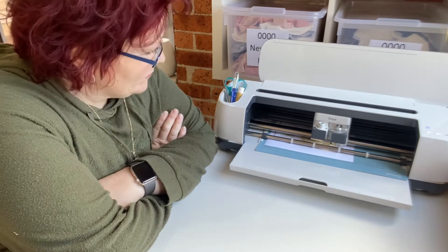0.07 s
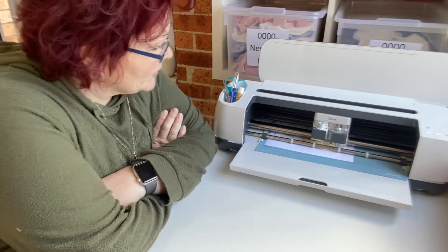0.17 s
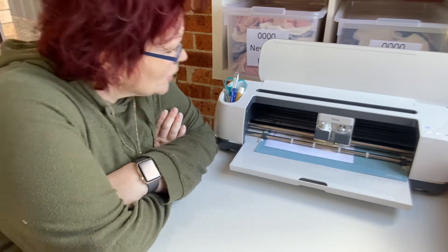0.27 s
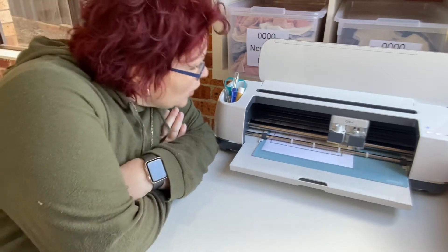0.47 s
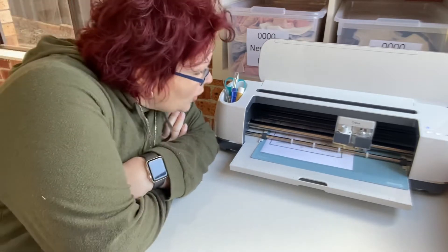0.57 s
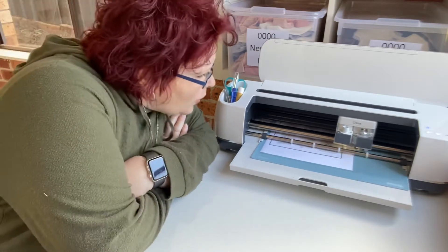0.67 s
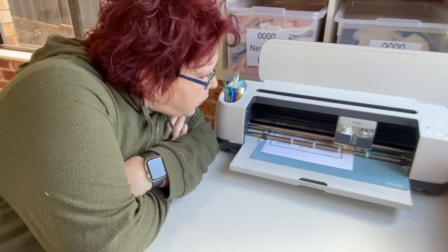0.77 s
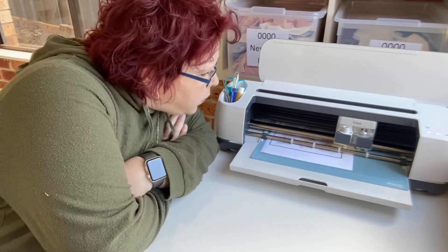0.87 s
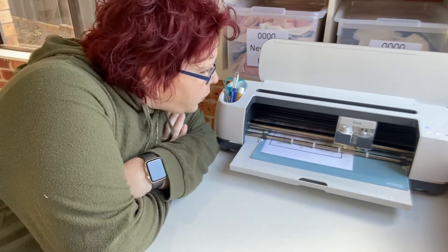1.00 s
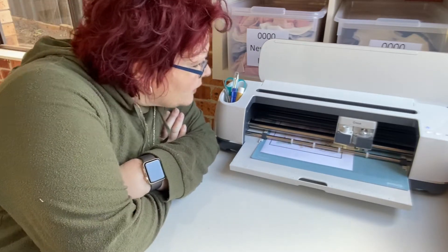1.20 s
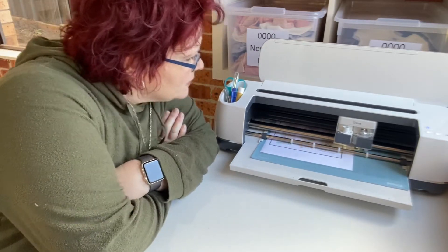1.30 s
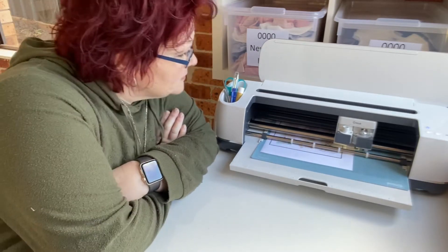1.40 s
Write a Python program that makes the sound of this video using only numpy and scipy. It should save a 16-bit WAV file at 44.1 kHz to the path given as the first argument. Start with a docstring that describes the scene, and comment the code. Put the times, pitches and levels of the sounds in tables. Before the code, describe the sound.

In a small quiet room, a cutting machine a little right of the microphone whirs up and brakes. A soft hissing glide follows, ending in a thump and a few plastic clacks over a low table shudder.

```python
"""A desktop cutting machine on a table, a little to the right, in a small quiet room.
With a thin snap a geared motor spins up, whines and rattles as it feeds the sheet through the rollers,
and brakes. The carriage then glides along its rail with a fading hiss. Last, the tool holder sets down
with a thump and a few plastic clacks. Case and table shudder underneath while anything moves."""
import sys
import numpy as np
from scipy import signal
from scipy.fft import rfft, irfft
from scipy.io import wavfile

SR = 44100
rng = np.random.default_rng(int(sys.argv[2]) if len(sys.argv) > 2 else 0)


def bounce(signal):
    """Save signal as a 16-bit WAV file at the path given by the first command-line argument."""
    frames = np.transpose(np.atleast_2d(signal))
    limited = np.clip(frames, -1, 1)
    pcm = np.round(limited * 32767).astype(np.int16)
    wavfile.write(sys.argv[1], SR, pcm)


N = 63945
T = np.arange(N) / SR
FEED_LEAD_MS, CARRIAGE_LEAD_MS = 0.17, 0.094  # how much sooner the right ear hears them


# feed motor's run: (time [s], speed [share of full])
MOTOR_SPEED = [(.195, .05), (.24, .58), (.265, .77), (.284, 1.0), (.53, 1.0), (.565, .76), (.595, .5),
               (.635, .05)]
def feed_motor(mesh_hz=685.6, wobble=0.0007, jitter_rad=0.13, grain=0.28):
    """One motor drives gears, shafts and rollers; returns its tones and its tooth-pulsed noise."""
    speed = in_time(MOTOR_SPEED)
    travel = np.cumsum(speed * (1 + wobble * drift(11))) / SR
    teeth = mesh_hz * travel + jitter_rad * drift(110) / (2 * np.pi)
    tones = gear_whine(speed, teeth) + shaft_hum(speed, travel)
    contacts = rms_one(np.exp(grain * (np.cos(2 * np.pi * teeth) + .5 * drift(53))))
    return tones, contacts * (gear_rattle() + sheet_rub())


# whine envelope: (time [s], level [dB])
WHINE_ENVELOPE = [(.19, -55), (.24, -9), (.272, -5.5), (.293, 1.5), (.335, -1), (.362, -5.5), (.39, -1),
                  (.44, -0.5), (.49, -5), (.53, -7), (.56, -6.5), (.63, -29)]
# whine partials: (multiple of the tooth rate, level [dB], left over right [dB], right ear's lead [rad])
WHINE_PARTIALS = [(1, -30, 1.5, 0.41), (2, -23, -4, 1.23), (3, -36.5, 2, 0.16), (4, -45, -9.5, 2.1),
                  (6, -54, -9, 2.2)]
# housing resonances: (pitch [Hz], t60 [s], gain on the whine, level when shaken [dB])
HOUSING_MODES = [(1030, .12, 1.3, -41), (1205, .12, .25, -35), (1310, .12, .03, -38), (1420, .1, .03, -36),
                 (2075, .14, .4, -44)]
def gear_whine(speed, teeth, flutter_db=2):
    """Meshing teeth sing, directly and through the housing resonances that their pitch sweeps."""
    partials = sum(from_db(db) * tone(multiple * teeth, pan_db, lead, flutter_db)
                   for multiple, db, pan_db, lead in WHINE_PARTIALS)
    whine = level(WHINE_ENVELOPE) * partials
    direct = whine * speed ** 3.5
    return direct + sum(gain * resonance(whine, hz, t60) for hz, t60, gain, _ in HOUSING_MODES)


# shaft tones: (pitch at full speed [Hz], level [dB], left over right [dB], right ear's lead [rad])
SHAFT_TONES = [(76.3, -40, -2, .1), (296, -45, -3, .1), (312, -42, -4, .1), (423.6, -42, 3, .6),
               (510, -50, 0, .4), (811, -49, 1, .5), (1183.5, -48, -3, .8), (1268.6, -43, -4, .9),
               (1292.5, -43, -4, .9), (1309, -43, -4, .9), (1432.5, -46, -3, .9), (1728, -51, 3, 1.2),
               (2137, -52, 0, .5), (2196, -52, 0, .5)]
def shaft_hum(speed, travel, boost_db=2, flutter_db=2.5):
    """Shafts and slower gears hum, swelling steeply with speed."""
    running = np.clip(speed - MOTOR_SPEED[0][1], 0, 1) ** 5 * (T < MOTOR_SPEED[-1][0])
    return running * sum(from_db(boost_db + db) * tone(hz * travel, pan_db, lead, flutter_db)
                         for hz, db, pan_db, lead in SHAFT_TONES)


# rattle envelope: (time [s], level [dB])
RATTLE_ENVELOPE = [(.18, -57.5), (.215, -45), (.25, -28.5), (.3, -34.5), (.36, -33.5), (.43, -33),
                   (.52, -34.5), (.58, -33), (.625, -52), (.69, -48.5)]
# its midrange colour: (frequency [Hz], level [dB])
RATTLE_COLOUR = [(150, -27), (300, 0), (600, -7), (900, -0.5), (1110, -13), (1330, 1), (1530, -10),
                 (1730, 0), (1920, -23), (2200, -4.5), (2500, -16.5), (3400, -17), (3800, -23.5),
                 (6000, -34.5)]
def gear_rattle():
    """The gear teeth rattle, hardest during spin-up."""
    return level(RATTLE_ENVELOPE) * noise(RATTLE_COLOUR, lead_ms=0.16) * pan(-1)


# rub envelope: (time [s], level [dB])
SHEET_ENVELOPE = [(.2, -62.5), (.225, -56.5), (.25, -45), (.295, -39.5), (.36, -43.5), (.43, -38.5),
                  (.52, -44), (.56, -48.5), (.61, -57.5), (.68, -64)]
# its bright colour: (frequency [Hz], level [dB])
SHEET_COLOUR = [(1500, 9), (3200, 11), (4200, 6), (5400, 2), (6500, -1.5), (7700, 0), (8900, 7.5),
                (10000, 1), (12500, -3.5), (15000, -1), (16000, -22)]
def sheet_rub():
    """The sheet hisses as it rubs under the rollers."""
    return level(SHEET_ENVELOPE) * noise(SHEET_COLOUR, FEED_LEAD_MS)


# swells of motor strain: (time [s], half length [s], level [dB])
STRAIN_SWELLS = [(0.261, 0.029, 2), (0.568, .032, -3.5)]
def strained_housing():
    """The housing rings roughly while the motor speeds up and brakes."""
    shaken = sum(from_db(db) * rubbed_ring(hz, 2 / t60) for hz, t60, _, db in HOUSING_MODES)
    return swells(STRAIN_SWELLS) * pan(-3) * shaken


# envelopes of the glide's body and its hiss: (time [s], level [dB])
GLIDE_ENVELOPE = [(.62, -83), (.69, -49), (.73, -41.5), (.77, -40), (.85, -43.5), (.93, -49), (1.02, -56),
                  (1.1, -63.5), (1.2, -81)]
HISS_ENVELOPE = [(.68, -71), (.73, -51), (.8, -47), (.88, -51.5), (1.0, -56), (1.08, -66.5), (1.19, -79)]
# their colours: (frequency [Hz], level [dB])
GLIDE_COLOUR = [(200, -13), (550, 6), (950, -4.5), (1400, 4), (1900, 2), (2500, -6.5), (3200, -11),
                (4200, -22), (6000, -34)]
HISS_COLOUR = [(2000, 6.5), (4000, 1.5), (5500, 1.5), (7800, 2), (9500, -19.5), (12000, 0.5), (15000, -14),
               (16000, -10)]
# resonances rubbed by the carriage: (pitch [Hz], width [Hz], level [dB])
GLIDE_MODES = [(1718, 41, -14), (1930, 16, -13), (1886, 18, -14), (2304, 30, -19)]
# soft whirrs as it sets off and settles: (time [s], half length [s], level [dB])
WHIRR_SWELLS = [(.715, 0.025, -43.5), (1.11, 0.04, -53)]
def carriage(rail_hz=3498, sag_hz_per_s=330, grain_db=0.5):
    """Grainy sliding friction, a thin ring of the rail that sags in pitch, and a whirr at each end."""
    rail_pitch = rail_hz - sag_hz_per_s * (T - HISS_ENVELOPE[1][0])
    rail = from_db(-4.5) * rubbed_ring(rail_pitch, width_hz=43)
    body = noise(GLIDE_COLOUR, CARRIAGE_LEAD_MS)
    body += sum(from_db(db) * rubbed_ring(hz, width) for hz, width, db in GLIDE_MODES)
    hiss = noise(HISS_COLOUR, CARRIAGE_LEAD_MS) + rail
    slide = level(GLIDE_ENVELOPE) * body + level(HISS_ENVELOPE) * hiss
    grain = from_db(grain_db * drift(160))
    return slide * grain + swells(WHIRR_SWELLS) * rubbed_ring(610, width_hz=95)


# hits of the mechanism: (time [s], thump [dB], clack [dB], tick [dB])
KNOCK_HITS = [(0.201, -37, -49, -68), (.69, -47, -40, -51), (0.762, -49.5, -38.5, -57),
              (1.207, -39.5, -52, -79.5), (1.233, -47, -39, -48), (1.245, -54, -33, -48),
              (1.32, -73, -35.5, -44.5), (1.33, -40, -43.5, -68), (1.367, -41, -44, -57)]
# modes of the case and the plastic tool holder: (pitch [Hz], level [dB], t60 [s])
CASE_MODES = [(94.6, -6.5, 0.23), (176.7, -0.5, 0.46), (293, -2, 0.19), (359, -11.5, .08), (423, -4, 0.061),
              (630, -10, .06)]
HOLDER_MODES = [(875, -11, 0.12), (1326, -24, 0.043), (1440, -15, .06), (1525, -21, 0.055),
                (2196, -12.5, 0.066), (3280, -23, 0.094)]
# colours of clack and tick: (frequency [Hz], level [dB])
CLACK_COLOUR = [(200, -3), (600, -2), (850, 10), (1100, 2), (1450, 6.5), (1850, -7), (2250, 1.5),
                (2800, -18), (3400, -16), (4500, -33), (9000, -39)]
TICK_COLOUR = [(1200, -15), (2400, 13), (5000, 2), (7000, -10), (10000, -29), (15000, -32)]
def knocks():
    """Each knock rings the case and the tool holder, with a plastic clack and a short bright tick."""
    times, thump_db, clack_db, tick_db = np.transpose(KNOCK_HITS)
    rings = struck(CASE_MODES, times, thump_db) + struck(HOLDER_MODES, times, clack_db)
    clacks = bursts(times, clack_db, t60=0.058) * noise(CLACK_COLOUR, CARRIAGE_LEAD_MS)
    ticks = bursts(times, tick_db, t60=0.03) * noise(TICK_COLOUR, CARRIAGE_LEAD_MS)
    return rings + clacks + ticks


# snap hits: (time [s], level [dB])
SNAP_HITS = [(.195, -44.5), (1.24, -53)]
# their crisp colour: (frequency [Hz], level [dB])
SNAP_COLOUR = [(2000, -1), (4500, 1), (7000, -2), (10000, -1), (15000, -10)]
def drive_snaps():
    """The drive snaps thinly as it takes up its play."""
    return bursts(*np.transpose(SNAP_HITS), t60=0.028) * noise(SNAP_COLOUR, FEED_LEAD_MS)


# bass hits: (time [s], level [dB])
BUMP_HITS = [(0.65, -31.5), (0.69, -36), (.892, -36), (.946, -33.5), (1.067, -39.5), (1.099, -40),
             (1.175, -41.5), (1.408, -42)]
def drive_bumps(hz=90, t60=0.062):
    """The carriage drive bumps softly, ringing one low, damped mode."""
    return struck([(hz, 0, t60)], *np.transpose(BUMP_HITS))


# shudder envelope: (time [s], level [dB])
SHUDDER_ENVELOPE = [(.17, -52.5), (.21, -36.5), (.3, -40), (.5, -40), (.63, -39.5), (.7, -39), (.8, -50),
                    (.85, -43), (1.03, -59.5), (1.19, -62), (1.23, -39.5), (1.38, -44.5), (1.45, -53)]
# its bass-heavy colour: (frequency [Hz], level [dB])
SHUDDER_COLOUR = [(40, -46), (85, 3), (125, -2), (172, 0), (220, -25), (295, -1.5), (370, -9.5), (550, -8),
                  (900, -21.5), (2000, -38)]
def shudder():
    """Case and table rumble while anything moves."""
    return level(SHUDDER_ENVELOPE) * noise(SHUDDER_COLOUR, CARRIAGE_LEAD_MS)


# idle envelope: (time [s], level [dB])
IDLE_ENVELOPE = [(1.05, -60), (1.2, -63), (1.38, -64.5), (1.45, -78)]
# its soft colour: (frequency [Hz], level [dB])
IDLE_COLOUR = [(1000, 13), (3000, 6), (5000, -1), (7500, -3), (10000, -26), (15000, -19)]
def idle_hiss():
    """The mechanism hisses faintly once the carriage comes to rest."""
    return level(IDLE_ENVELOPE) * noise(IDLE_COLOUR, CARRIAGE_LEAD_MS)


# dark bed of room tone: (frequency [Hz], level [dB])
ROOM_COLOUR = [(25, -12), (48, 4), (75, -2), (120, -7), (180, -8), (300, -17.5), (600, -17), (1200, -26),
               (2500, -30.5), (5000, -50), (10000, -70), (16000, -60)]
def room_tone(db=-51.5):
    """The quiet room murmurs steadily."""
    return from_db(db) * noise(ROOM_COLOUR, CARRIAGE_LEAD_MS)


def room(x, t60=.28, send_db=-6, cut_hz=4500):
    """Dull, diffuse tail of a small room."""
    tail = rng.standard_normal((2, N)) * from_db(-60 * T / t60) * (T > .004)
    tail /= np.sqrt(np.sum(tail ** 2) / 2)
    tail = signal.sosfilt(signal.butter(2, cut_hz, fs=SR, output="sos"), tail)
    return from_db(send_db) * signal.fftconvolve(x, tail, axes=1)[:, :N]


def from_db(db):
    """Decibels to gain."""
    return 10 ** (np.asarray(db) / 20)


def rms_one(x):
    """Scale to rms 1."""
    return x / np.sqrt(np.mean(x ** 2) + 1e-20)


def in_time(rows):
    """Join (time, value) points by straight lines."""
    return np.interp(T, *np.transpose(rows))


def level(rows):
    """Gain from (time [s], level [dB]) points, dying away outside them."""
    outside = np.maximum(rows[0][0] - T, 0) + np.maximum(T - rows[-1][0], 0)
    return from_db(in_time(rows) - 300 * outside)


def swells(rows):
    """Envelope of smooth humps."""
    return sum(from_db(db) * np.exp(-((T - time) / half_length) ** 2) for time, half_length, db in rows)


def bursts(times, dbs, t60, attack_s=.0012):
    """Envelope of quick attacks with exponential tails."""
    age = np.maximum(T - times[:, None], 0)
    hits = from_db(dbs[:, None] - 60 * age / t60) * np.minimum(age / attack_s, 1)
    return np.sqrt(np.sum(hits ** 2, axis=0))


def at_hz(points, hz):
    """Read (frequency, value) points on a log-frequency axis."""
    freqs, values = np.transpose(points)
    return np.interp(np.log(hz + 1), np.log(freqs), values)


def drift(rate_hz):
    """Smooth random modulation with spread 1."""
    r = np.exp(-80 * np.pi * rate_hz / SR)
    slow = signal.lfilter([1], [1, -2 * r, r * r], rng.standard_normal(N // 40 + 2002))[2000:]
    return np.interp(np.arange(N) / 40, np.arange(len(slow)), rms_one(slow))


def pan(db):
    """Left and right gains for a level difference; negative leans right."""
    return from_db(np.array([[db], [-db]]) / 2)


# stereo image: (frequency [Hz], likeness of the two ears [0-1])
EAR_LIKENESS = [(80, .99), (300, 0.75), (700, 0.4), (2000, 0.64), (5000, 0.06), (8500, 1), (15000, 1)]
def noise(colour, lead_ms):
    """Coloured stereo noise of rms 1 that reaches the right ear first."""
    hz = np.arange(N // 2 + 1) * SR / N
    shared, left, right = rfft(rng.standard_normal((3, N)))
    alike = at_hz(EAR_LIKENESS, hz)
    lag = np.exp(-2j * np.pi * hz * lead_ms / 1000)
    ears = np.sqrt(alike) * np.array([shared * lag, shared])
    ears += np.sqrt(1 - alike) * np.array([left, right])
    rolloff = np.maximum(hz / colour[-1][0], 1) ** 2 * np.maximum(colour[0][0] / (hz + 1), 1) ** 2
    return rms_one(irfft(ears * from_db(at_hz(colour, hz)) / rolloff, N))


def tone(cycles, pan_db, lead_rad, flutter_db):
    """A fluttering stereo sine of rms about 1."""
    flutter = from_db(flutter_db * (drift(38) + np.array([drift(19), drift(19)])) / np.sqrt(2))
    phase = 2 * np.pi * (cycles + rng.random()) - np.array([[lead_rad], [0]])
    return np.sqrt(2) * pan(pan_db) * flutter * np.sin(phase)


def rubbed_ring(hz, width_hz):
    """A resonance kept ringing by friction; rms 1."""
    delay_s = np.array([[CARRIAGE_LEAD_MS], [0]]) / 1000
    phase = 2 * np.pi * (np.cumsum(hz * np.ones(N)) / SR - hz * delay_s)
    return rms_one(drift(width_hz) * np.sin(phase) + drift(width_hz) * np.cos(phase))


def struck(modes, times, dbs):
    """Blows ring a set of modes as decaying sines, each with a strength of its own."""
    out = 0
    for hz, db, t60 in modes:
        clicks = np.zeros(N)
        clicks[(times * SR).astype(int)] = from_db(dbs + db + rng.normal(0, 1.6, len(times)))
        r, w = from_db(-60 / (t60 * SR)), 2 * np.pi * hz / SR
        out += signal.lfilter([0, np.sin(w)], [1, -2 * r * np.cos(w), r * r], clicks + 1e-18)
    return out


def resonance(x, hz, t60):
    """Band-pass with gain 1 at its peak."""
    r, w = from_db(-60 / (t60 * SR)), 2 * np.pi * hz / SR
    return signal.lfilter(np.array([1, 0, -1]) * (1 - r * r) / 2, [1, -2 * r * np.cos(w), r * r], x)


def scene():
    """The machine's noises feed the room's tail; the motor's tones and the low bed stay dry."""
    tones, feed_noise = feed_motor()
    idle = idle_hiss()
    noises = feed_noise + drive_snaps() + strained_housing()
    noises += (carriage() + knocks() + idle) * pan(-0.4)
    lows = drive_bumps() + shudder() + room_tone()
    return tones + noises + room(noises) + lows * pan(-1.2)


def record(dry, low_cut_hz=37, high_cut_hz=15750):
    """The deepest bass is rolled off and the top is cut steeply."""
    thinned = signal.sosfilt(signal.butter(2, low_cut_hz, "high", fs=SR, output="sos"), dry)
    return signal.sosfilt(signal.ellip(12, .1, 90, high_cut_hz, fs=SR, output="sos"), thinned)


dry = scene()
out = record(dry)
bounce(out)
```